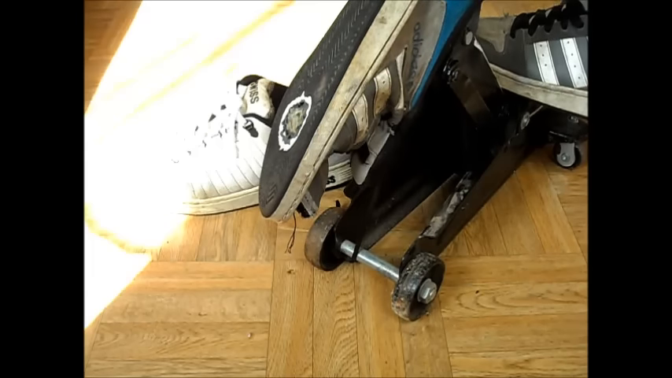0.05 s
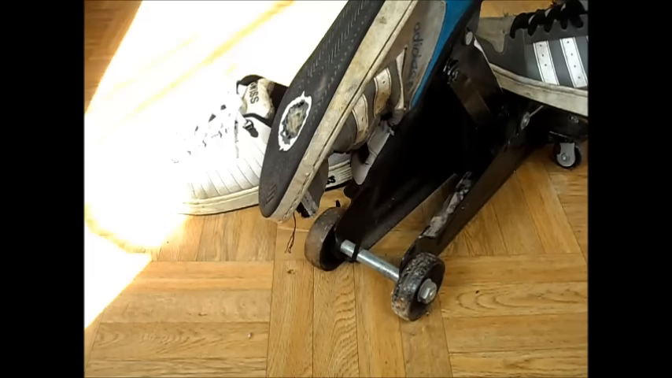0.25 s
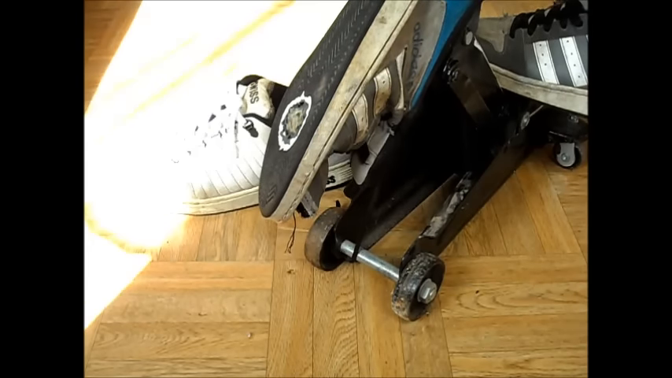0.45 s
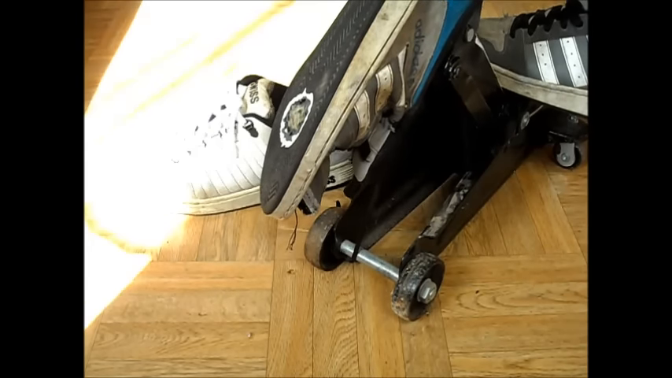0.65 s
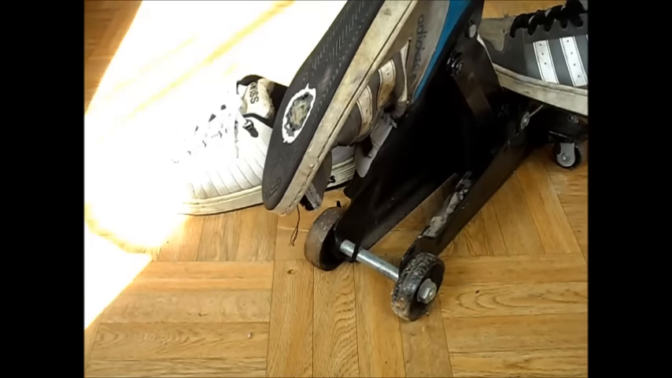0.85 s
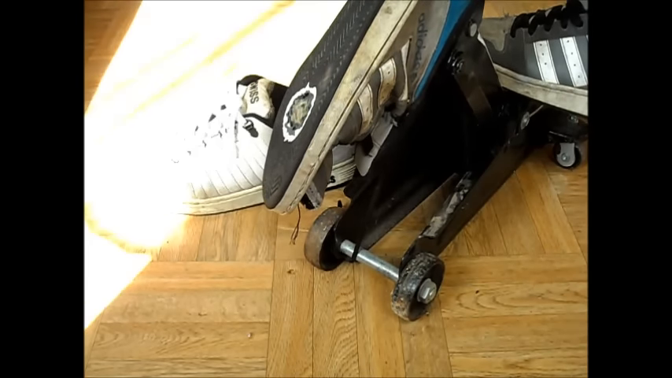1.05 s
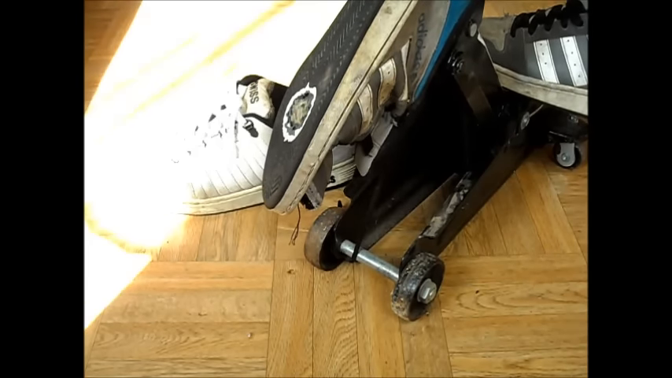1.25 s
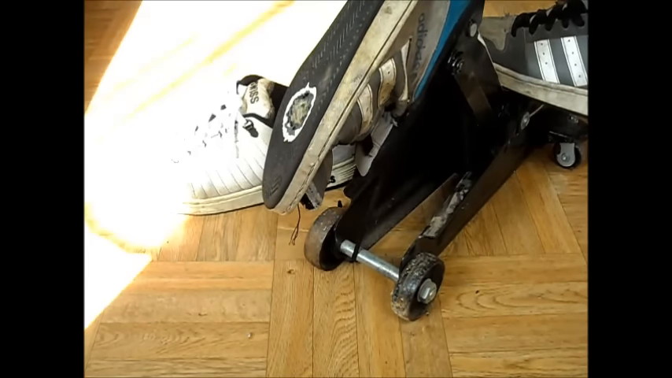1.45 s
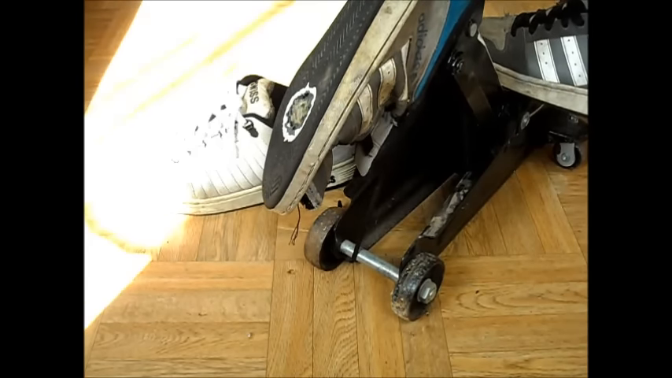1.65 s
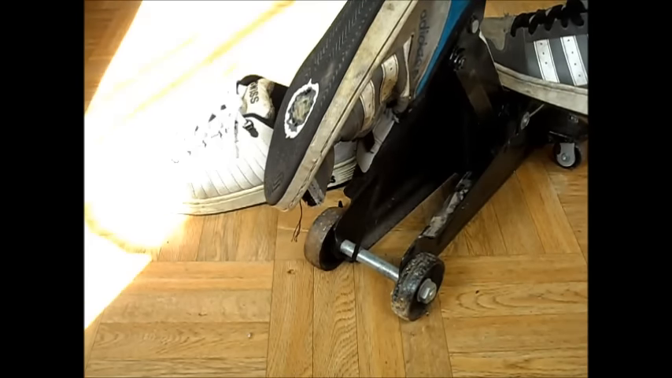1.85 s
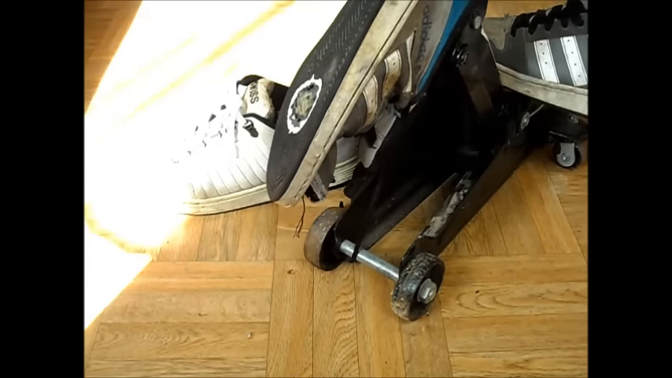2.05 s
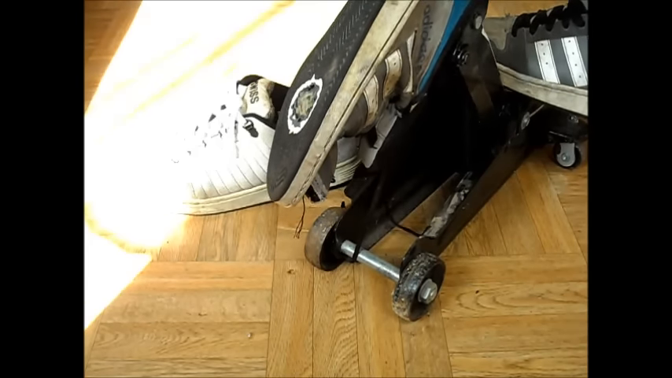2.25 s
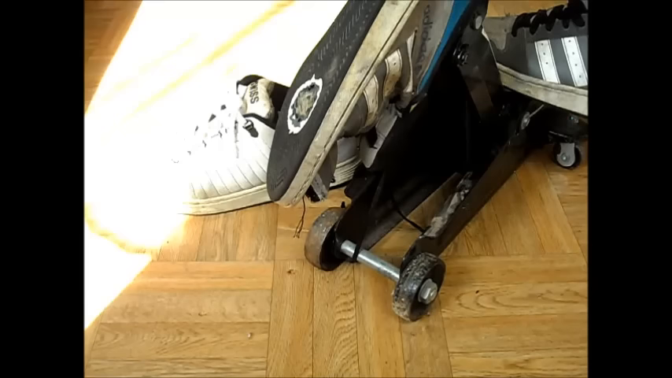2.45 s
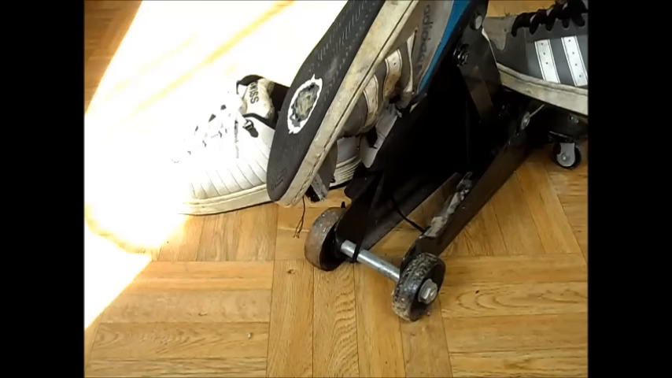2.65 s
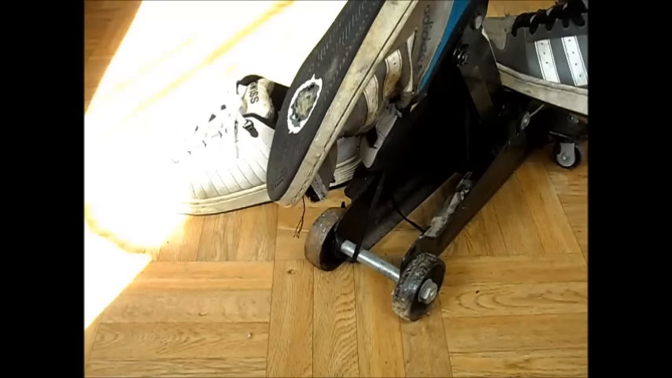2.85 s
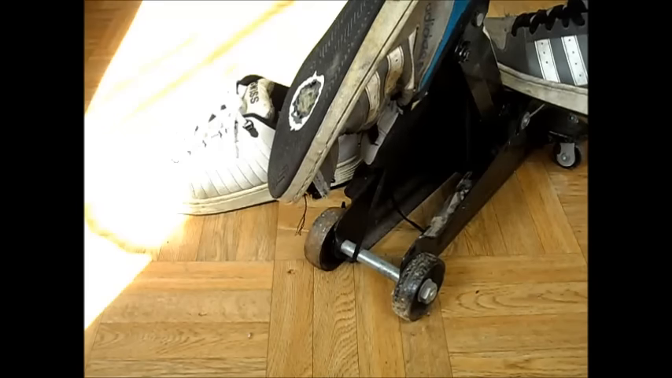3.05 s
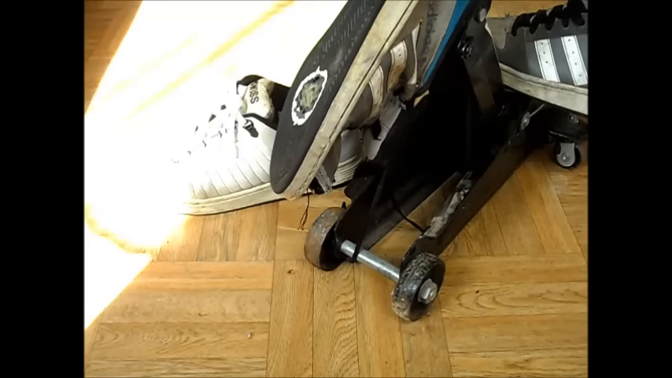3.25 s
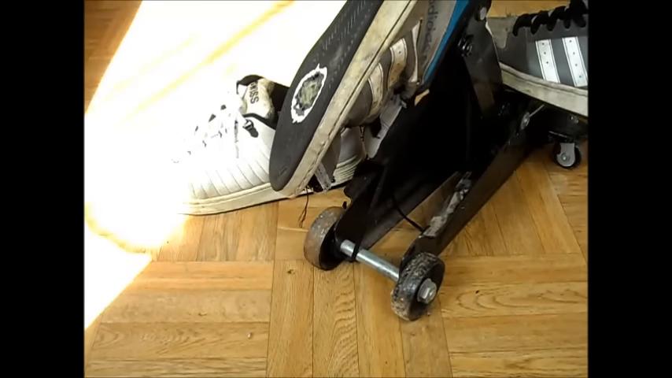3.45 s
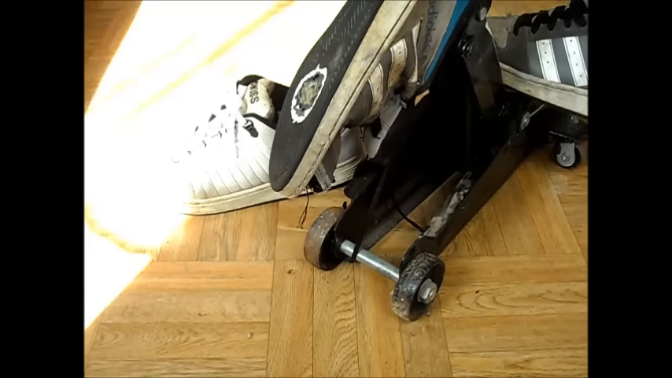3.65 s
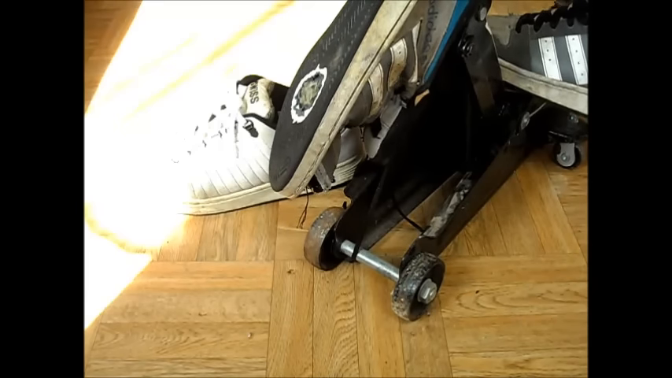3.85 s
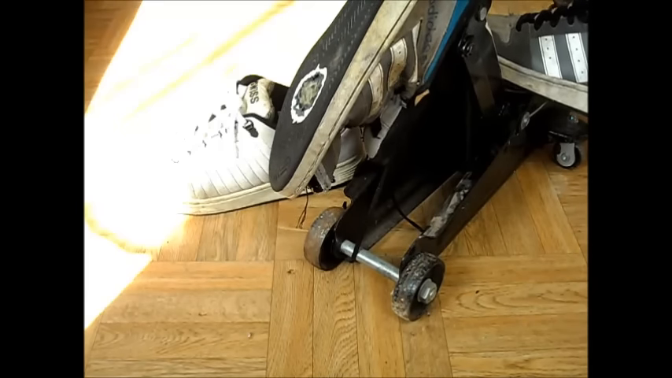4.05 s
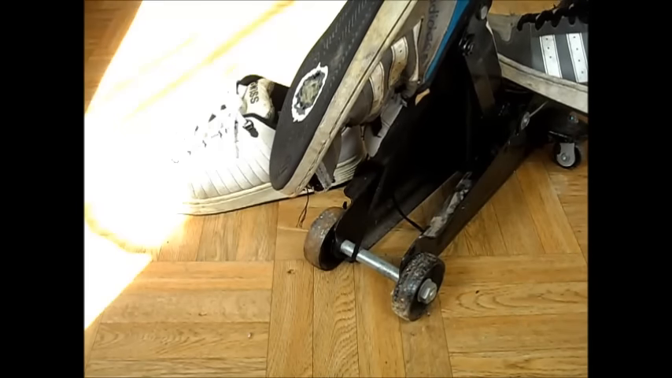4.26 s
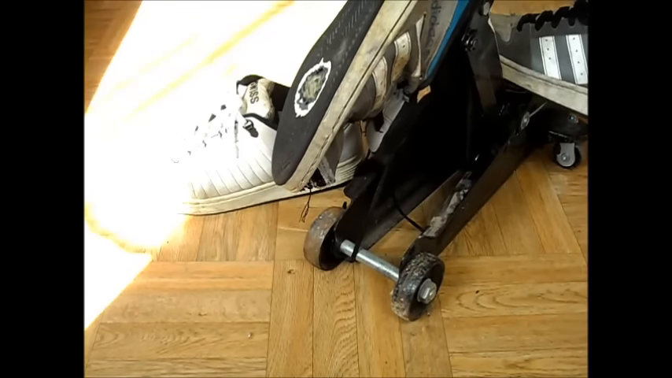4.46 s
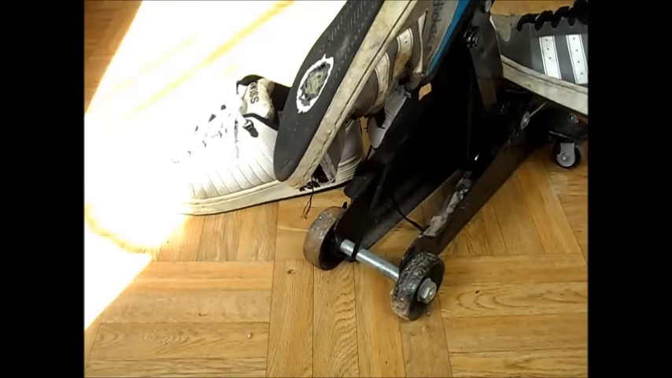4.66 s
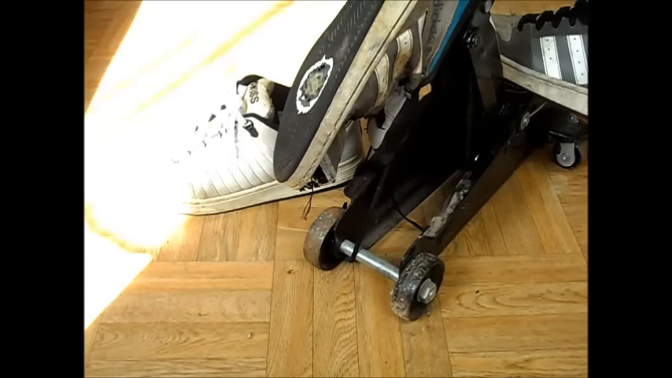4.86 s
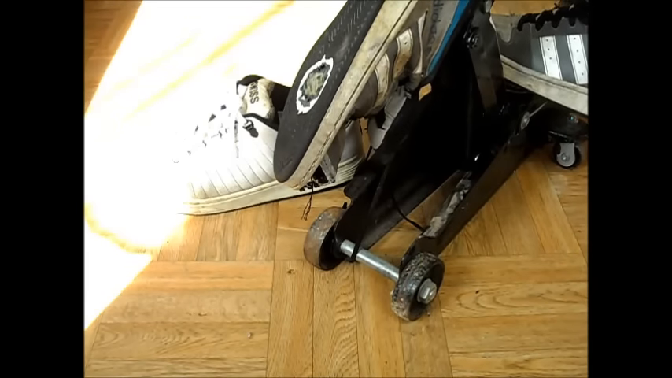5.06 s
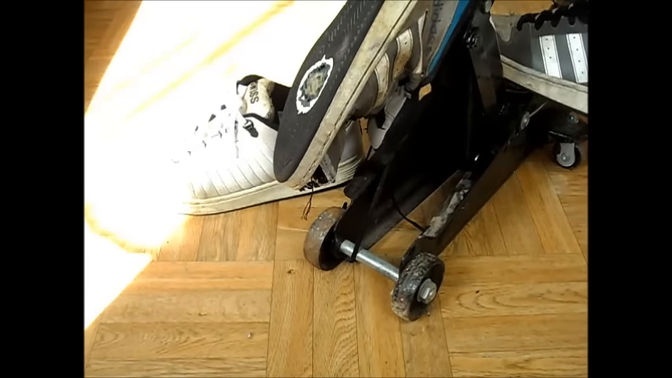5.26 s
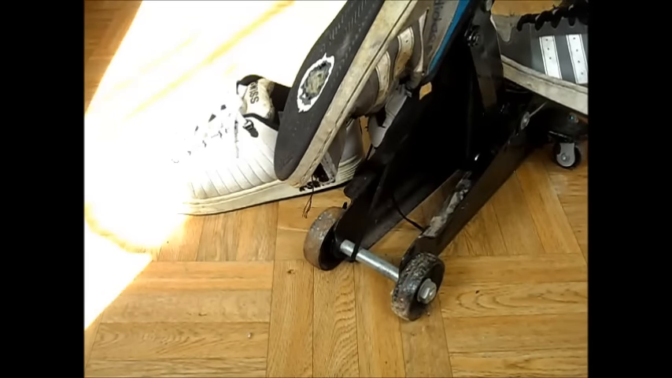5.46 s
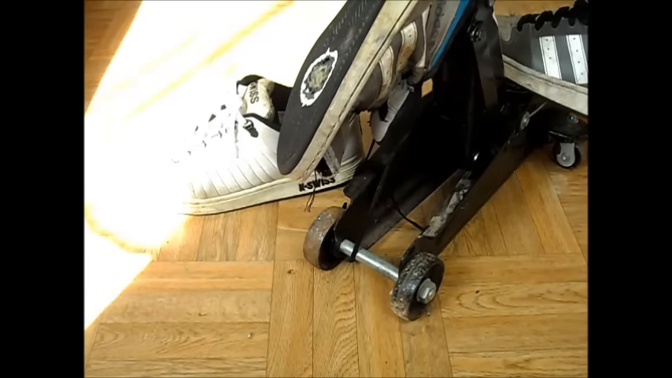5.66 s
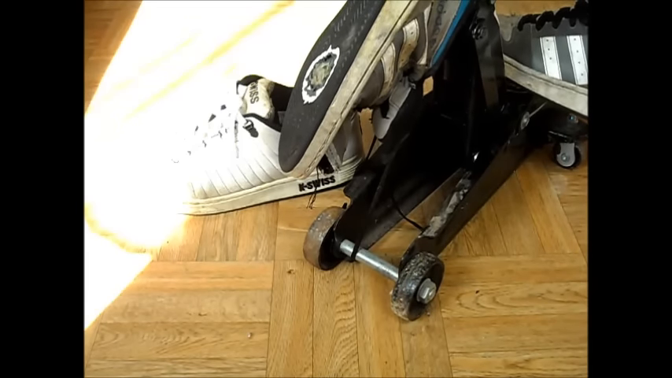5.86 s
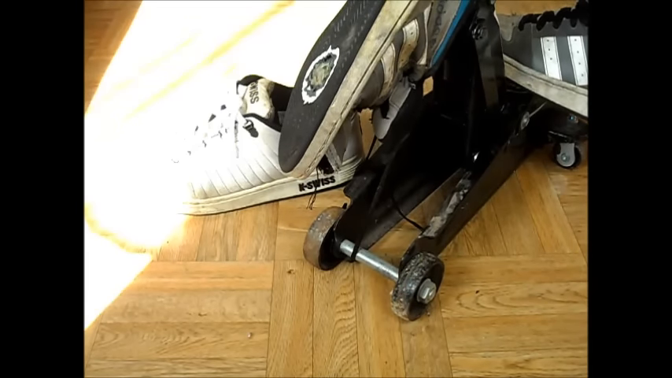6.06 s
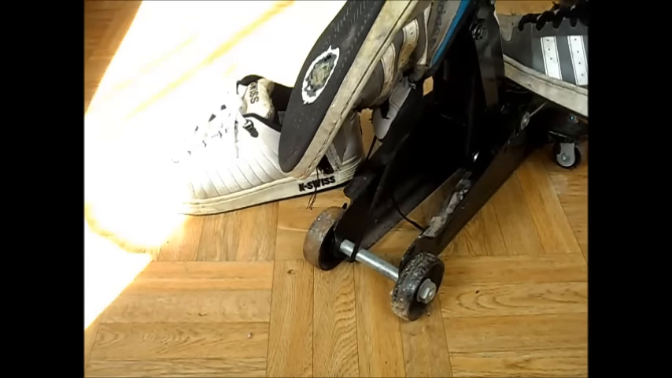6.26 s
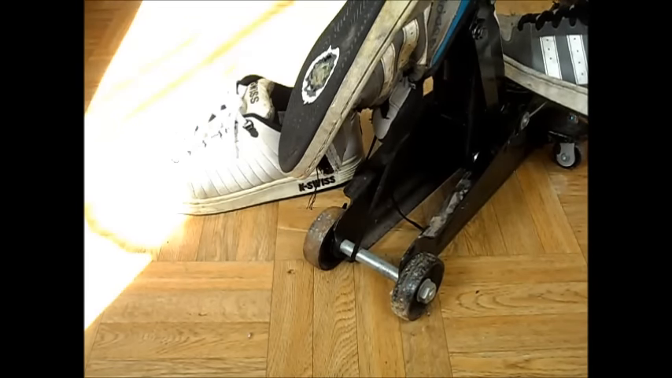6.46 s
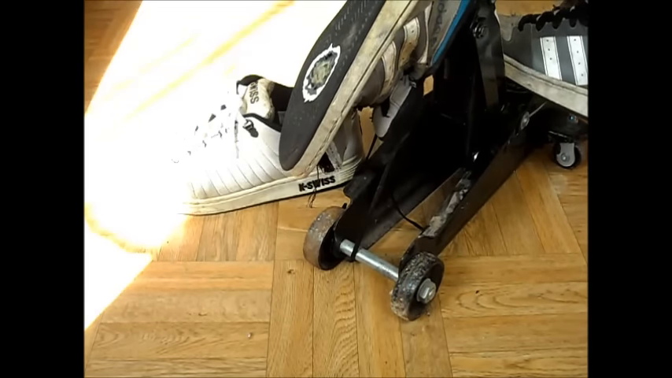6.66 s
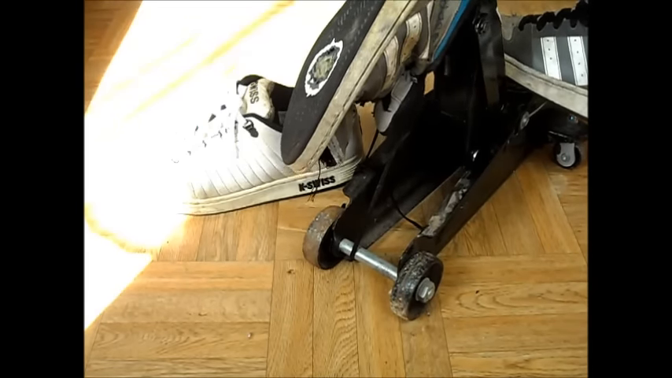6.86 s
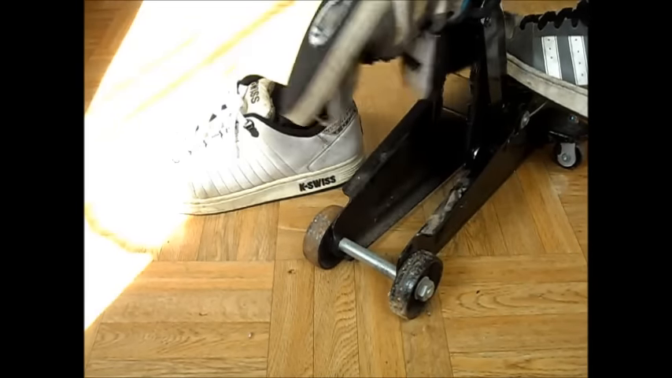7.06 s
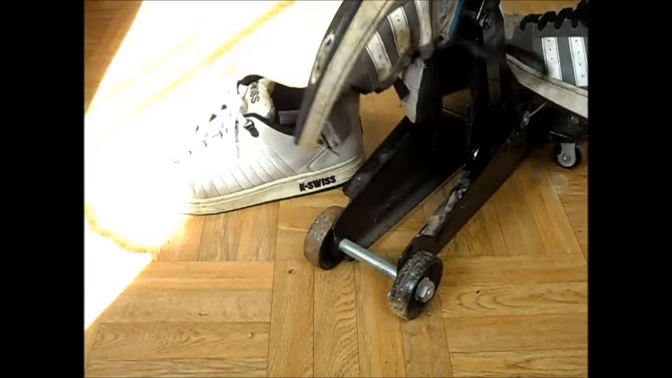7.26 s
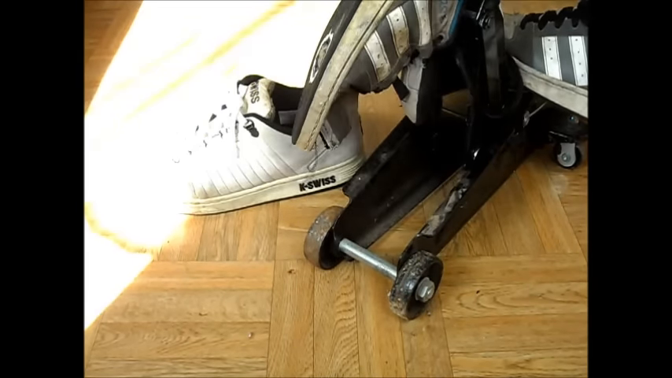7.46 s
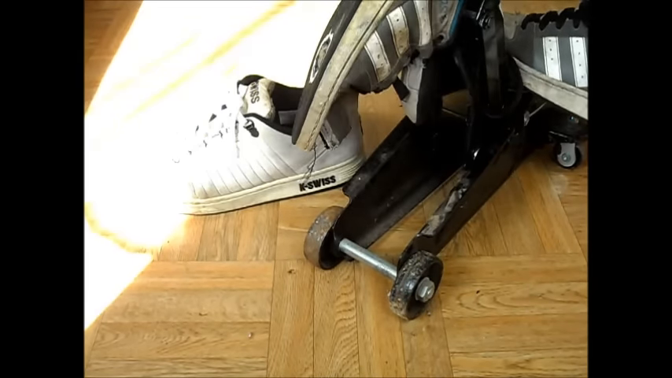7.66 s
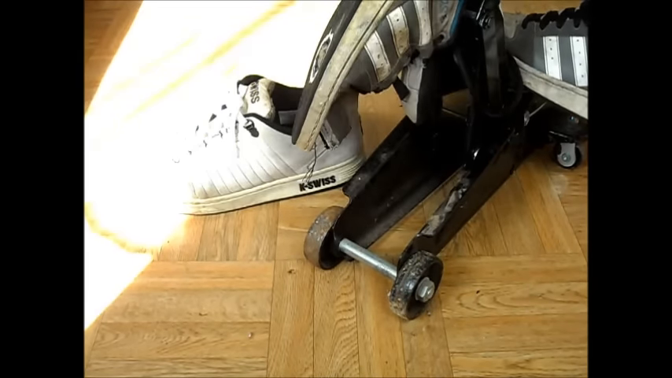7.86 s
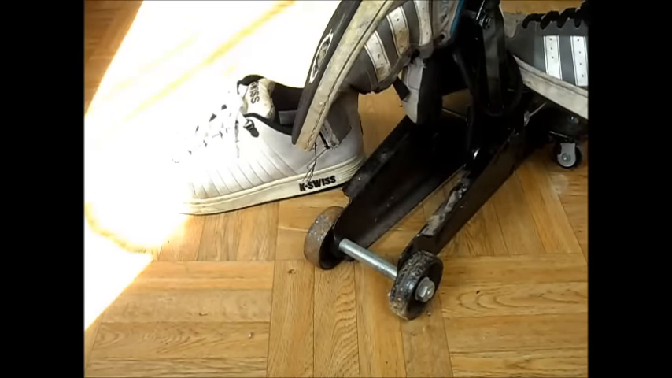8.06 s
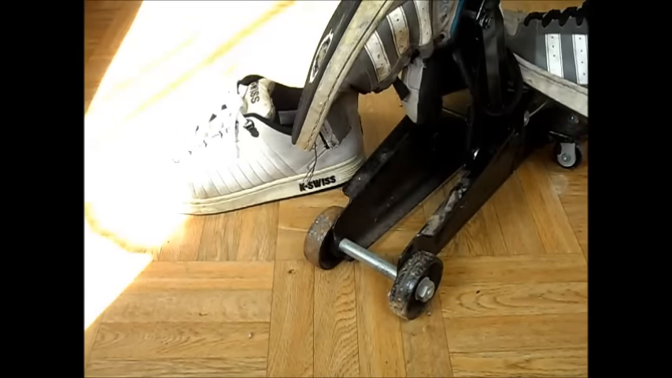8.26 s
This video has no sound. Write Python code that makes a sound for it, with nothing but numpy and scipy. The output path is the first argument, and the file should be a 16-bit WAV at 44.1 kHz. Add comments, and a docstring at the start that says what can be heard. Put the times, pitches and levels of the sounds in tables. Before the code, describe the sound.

Metallic clunks, rattles and low floor thumps repeat as a jack lifts against a shoe indoors, ending in one violent steel crack and quiet hiss.

```python
"""A soft rub of a shoe on a steel arm comes first, over faint hiss, then a trolley jack is pumped.
Place: parquet in a small room, heard by one microphone with the room's reflections strong around the steel.
Each stroke takes up slack, thumps the floor modes and clanks the linkage, made of swarms of tiny contacts
through coloured filters; pivots scrape, ping and squeak, and rubber and loaded steel rub and groan.
At last the shoe slips and the arm snaps free with a loud crack, which turns the recorder's gain down."""
import sys
import numpy as np
from scipy import signal
from scipy.io import wavfile
from scipy.ndimage import uniform_filter1d

SR = 44100
rng = np.random.default_rng(int(sys.argv[2]) if len(sys.argv) > 2 else 0)


def wav_out(sig):
    """Save sig, one row per channel (or a flat mono array), as 16-bit PCM at SR to the path in sys.argv[1]."""
    wavfile.write(sys.argv[1], SR, np.round(np.clip(np.atleast_2d(sig).T, -1, 1) * 32767).astype(np.int16))


N = 366010

# Levels of events are in dB before the trim of their layer; colours and modes are relative.
# t60_s is the time to die by 60 dB.

# air and microphone noise, colour: hz, level_db
HISS = [(20, -9.5), (90, 1), (170, -5.5), (270, -8), (500, -10), (1000, -13.5), (2000, -17), (4000, -20),
        (7000, -21), (10500, -25)]
# room decay: hz, t60_s
ROOM = [(100, 0.63), (300, 0.31), (700, 0.38), (2300, 0.47), (5500, 0.32), (10000, .28)]
# modes of the floor: pitch_hz, level_db, t60_s
FLOOR = [(56, -16.5, .25), (76.4, 8.5, .36), (102.4, 8, 0.37), (122, -12.5, .2), (142.4, -12, 0.96)]
# clusters of close modes in the steel arm: centre_hz, spread_hz (either side), level_db, t60_s
ARM = [(189.2, 13, -5.5, 0.53), (258, 44, 1, .42), (393, 53, -9, 0.58), (673, 45, -11.5, 0.72),
       (1078, 110, -1.5, 0.19), (2217, 250, -10, 0.21), (3310, 650, -15, 0.43), (5450, 340, -10, 0.38),
       (7970, 120, -20, .32)]
# colours of the heavy frame, the lever, the pivots, the rubbing and the snap: hz, level_db
FRAME = [(70, -29), (130, 2.5), (185, -2), (250, -4), (310, 4.5), (372, 2.5), (440, 0.5), (520, -9.5),
         (600, -9), (660, -5), (780, -22.5), (1200, -46.5)]
LEVER = [(500, -22), (800, -2), (1000, 0.5), (1150, 5), (1340, 3), (1630, -7.5), (2050, -0.5),
         (2600, -11.5), (3050, -14), (3700, -24.5), (5400, -32), (9000, -46.5)]
PIVOT = [(1200, -26), (2300, 7.5), (3300, -1.5), (3800, 2), (4250, -1), (4800, -4), (5450, 3), (6200, -3),
         (7100, -4.5), (7900, -7.5), (9000, -10), (10500, -26)]
RUB = [(100, -18), (180, 0.5), (370, 3.5), (520, -6.5), (900, -11.5), (1300, -16), (2200, -18),
       (3500, -23.5), (8000, -34)]
SNAP = [(40, -39), (150, -17.5), (350, -0.5), (720, 1.5), (1100, -2.5), (1700, -10.5), (2700, -10),
        (4200, -16), (5600, -15), (7000, -18.5), (10500, -30)]

# further slides of the shoe on the arm, one already under way as the sound begins and one as the shoe slips
# before the crack: start_s, length_s, rub_db, rumble_db, fade_db (over the length)
CREEPS = [(0.0, 0.348, -52, -48, -4), (6.89, 0.25, -58.5, -66, 4.5)]
# the loaded frame and the rubber sole groan: start_s, length_s, level_db, pitch_hz
GROANS = [(0.558, 0.046, -31, 379), (4.169, 0.13, -46, 369), (4.841, 0.051, -38.5, 378),
          (4.985, 0.078, -43.5, 209), (5.114, 0.16, -49, 378.3), (5.312, 0.15, -45.5, 367),
          (6.475, 0.067, -40, 385)]
# pivots squeak: start_s, length_s, level_db, pitch_hz, glide_hz_per_s
SQUEAKS = [(1.338, 0.025, -48, 1440, 1000), (1.368, 0.044, -53.5, 1596, -7000),
           (1.38, 0.052, -58.5, 1980, -6000), (6.227, 0.04, -58.5, 2026, -500),
           (6.312, 0.018, -59, 2000, -2000)]
# dry steel slips under the load: start_s, level_db
SLIPS = [(3.7199, -51), (5.296, -48.5), (6.8733, -57), (6.9037, -43.5), (6.986, -52.5)]
# small parts ping: start_s, level_db, pitch_hz, t60_s
PINGS = [(1.785, -47, 5430, 0.041), (3.544, -55.5, 4270, .04), (3.639, -49.5, 6130, 0.021),
         (4.867, -57, 5920, 0.025), (4.9323, -54, 6100, 0.011), (6.0192, -46.5, 6030, 0.013),
         (6.9063, -46, 6400, 0.012), (7.2978, -51.5, 5950, 0.0052)]
# low resonances that linger after the hardest blows: start_s, level_db, pitch_hz, t60_s
HUMS = [(1.792, -42.5, 141, 1.44), (7.051, -33, 49.4, 1.6)]
# the jack rocks on the floor, and the low modes swell a second time: start_s, level_db, drop_s (delay of the
# second swell)
THUMPS = [(1.061, -38.5, .041), (1.313, -44.5, .042), (2.209, -31, .035), (3.465, -32, .043),
          (3.674, -40, 0.043), (4.752, -40, .045)]
# the load shifts with a single knock: start_s, frame_db, lever_db and thud_db (both relative to the frame)
KNOCKS = [(0.134, -49, -14.5, -25), (1.239, -42.5, -4.5, -8), (1.629, -57.5, 0.5, 2), (1.717, -48.5, -2, 3),
          (3.718, -46, -2.5, -14), (4.828, -49, -7, -7), (5.18, -43.5, -11, -13), (6.308, -50.5, -8, 7),
          (7.751, -55.5, -4.5, 7)]
# handle down: the slack closes, the pivots bite in two catches, then the arm slides against the shoe:
# start_s, slack_db, bite_delay_s, frame_db, lever_db (relative), scrape_db, second_catch_db (relative),
# slide_length_s, rub_db, rumble_db, fade_db (over the slide)
PUSHES = [(1.033, -48.5, 0.11, -40, -7, -54.5, 2.5, 0.37, -47, -55, -9.5),
          (2.13, -43, 0.157, -44, -2.5, -46.5, 2.5, 0.4, -50.5, -49, -9),
          (3.379, -43.5, 0.17, -50.5, 4.5, -57, 1, 0.39, -48, -45.5, -3.5),
          (4.711, -45, 0.134, -46, -2.5, -52.5, 7.5, 0.54, -47, -47.5, -12.5),
          (5.969, -47, 0.024, -39.5, -2.5, -47.5, -0.5, 0.53, -43, -46, -23)]
# handle up: the slack closes, the linkage rattles, then grazes its stop, hits it and rebounds:
# start_s, slack_db, rattle_db, stop_delay_s, frame_db, lever_db (relative), thud_db (relative), scrape_db,
# graze_db (relative), rebound_db (each, relative to the one before)
LIFTS = [(0.436, -48.5, -51, 0.13, -34.5, -5.5, -6, -65, -12.5, -13.5),
         (1.68, -48.5, -46.5, 0.09, -32.5, -3, -2.5, -44.5, -17, -5),
         (2.827, -51, -53, 0.140, -34.5, -3, -5.5, -53, -9.5, -7),
         (4.163, -43.5, -51.5, 0.11, -35, -3, 6, -52, -16, -13),
         (5.297, -42, -49.5, 0.144, -37, -3, -10, -67, -8.5, -11.5),
         (6.493, -47.5, -49.5, 0.093, -34.5, -9.5, -6, -67, -5, -3.5)]
# the arm snaps free, followed by a few sharp echoes: start_s, strength_db
CRACK = [(7.0408, 4), (7.0505, -12.5), (7.0561, -12.5), (7.0625, -10.5), (7.0700, -17.5), (7.0845, -16)]
# the arm's weight lands on the floor: start_s, level_db
LANDING = [(7.043, -18.5), (7.083, -21.5), (7.109, -33)]

# time from one contact to the next as steel bounces
BOUNCE_S = 0.019
# time scales of the clatter, before the frame and the lever stretch them
SLACK_CLATTER_S, SLACK_SNAP_CLATTER_S, BITE_CLATTER_S = 0.0048, 0.0025, 0.0041
STOP_CLATTER_S, KNOCK_CLATTER_S = 0.0044, 0.0051
SCRAPE_CLATTER_S = 0.0038  # used as it is
# a slack knock and a bite, relative to the frame
SLACK_LEVER_DB, SLACK_THUD_DB, BITE_THUD_DB = -10, 0, -3
# the loose lever snaps home just after each slack knock: delay, frame relative to that knock, lever to the frame
SLACK_SNAP_S, SLACK_SNAP_DB, SLACK_SNAP_LEVER_DB = 0.009, -5.5, 0
# the rattle of a lift grows towards the stop and shakes the floor a little
RATTLE_SWELL_DB, RATTLE_RUMBLE_DB = 1.5, -4
# after the stop the jack settles: levels relative to the blow
SETTLE_S, SETTLE_DB, SETTLE_RUMBLE_DB, SETTLE_FADE_DB = 0.2, -16, -5.5, -17.5
# every rub starts and stops softly
RUB_ATTACK_S, RUB_RELEASE_S = 0.027, 0.044
# relative to the thump: the second swell and the jolt of the frame; then the lever relative to that jolt
SECOND_SWELL_DB, JOLT_DB, JOLT_LEVER_DB = 0, -8, -16.5
# upper band limit of the recorder
EDGE_HZ = 10650


def amp(db):
    """Turns decibels into an amplitude factor."""
    return 10 ** (np.asarray(db) / 20)


def evened(x):
    """Scales a steady sound to rms 1."""
    return x / np.sqrt(np.mean(x ** 2) + 1e-20)


def topped(x):
    """Scales a blow so that its loudest 10 ms have rms 1."""
    return x / np.sqrt(uniform_filter1d(x ** 2, size=441, mode="constant").max() + 1e-20)


def read(points, hz):
    """Reads a curve between its points, on a logarithmic frequency scale."""
    f, value = np.transpose(points)
    return np.interp(np.log(hz + 1), np.log(f + 1), value)


def add(mix, s, sound):
    """Lays a sound into the mix at s seconds, cut at the end."""
    part = mix[round(s * SR):][:len(sound)]
    part += sound[:len(part)]


def through(x, response):
    """Convolves with an impulse response, keeping the length."""
    return signal.fftconvolve(x, response)[:len(x)]


def colour(points):
    """Causal (minimum-phase) impulse response with the given spectrum and energy 1."""
    hz = abs(np.fft.fftfreq(4096, 1 / SR))
    log_gain = np.log(amp(read(points, hz)))
    spectrum = np.exp(np.conj(signal.hilbert(log_gain)))
    response = np.fft.ifft(spectrum).real[:2048]
    return response / np.linalg.norm(response)


def varied(points, spread_db):
    """The same part struck at another spot: its resonances shift in strength."""
    hz, db = np.transpose(points)
    return np.transpose([hz, db + spread_db * rng.standard_normal(len(hz))])


def ring(modes):
    """Sum of dying sines."""
    t = np.arange(2 * SR) / SR
    return sum(amp(db - 60 * t / t60) * np.sin(2 * np.pi * hz * t) for hz, db, t60 in modes)


def clatter(length_s, per_s=2200):
    """Loose steel meets in a quick swarm of small contacts that swells and dies."""
    u = np.arange(SR) / SR / length_s
    contacts = rng.standard_normal(SR) * (rng.random(SR) < per_s / SR)
    return contacts * u * np.exp(-u)


def room_tail(build_s=0.0045):
    """Dense reflections of energy 1, building up softly, each band dying at its own speed."""
    hz, t, bands = signal.stft(rng.standard_normal(SR), SR, nperseg=256)
    decay = amp(-60 * t / read(ROOM, hz)[:, None])
    tail = signal.istft(bands * decay, SR, nperseg=256)[1][:SR]
    tail *= 1 - np.exp(-(np.arange(SR) / SR / build_s) ** 2)
    return tail / np.linalg.norm(tail)


def in_room(x, tail, wet_db):
    """Adds the room's reflections to the direct sound."""
    return x + amp(wet_db) * through(x, tail)


def hiss(hiss_db=-61):
    """Steady air and microphone noise."""
    return amp(hiss_db) * evened(through(rng.standard_normal(N), colour(HISS)))


def boom(rise_s=0.0072, low_hz=52):
    """The floor answers a push with a soft start and its beating low modes."""
    modes = ring(FLOOR)
    modes = modes * (1 - np.exp(-np.arange(len(modes)) / SR / rise_s))
    return signal.sosfilt(signal.butter(2, low_hz, "highpass", fs=SR, output="sos"), modes)


def rubs():
    """Slides after bites, rattles before stops, settling, creeps: start_s, length_s, rub_db, rumble_db, fade_db."""
    rows = [(s + delay_s, *slide) for s, _, delay_s, _, _, _, _, *slide in PUSHES]
    for s, _, rattle_db, delay_s, db, *_ in LIFTS:
        rattle_s = delay_s + RUB_RELEASE_S
        rows.append((s, rattle_s, rattle_db, rattle_db + RATTLE_RUMBLE_DB, RATTLE_SWELL_DB))
        rows.append((s + delay_s, SETTLE_S, db + SETTLE_DB, db + SETTLE_RUMBLE_DB, SETTLE_FADE_DB))
    return rows + CREEPS


def rubbing(tail, per_s=500, rub_db=-7.5, rumble_db=-3):
    """Tiny slips of rubber and steel keep the frame and the floor stirring."""
    on_frame, on_floor = np.zeros((2, N))
    for s, length_s, db, low_db, fade_db in rubs():
        t = np.arange(0, length_s, 1 / SR)
        attack = np.minimum(t / RUB_ATTACK_S, 1)
        release = np.minimum((length_s - t) / RUB_RELEASE_S, 1)
        shape = attack * release * amp(fade_db * t / length_s)
        add(on_frame, s, amp(db) * shape)
        add(on_floor, s, amp(low_db) * shape)
    slips = evened(rng.standard_normal(N) * (rng.random(N) < per_s / SR))
    rub = in_room(through(slips * on_frame, colour(RUB)), tail, wet_db=-2)
    rumble = evened(through(slips, boom())) * on_floor
    return amp(rub_db) * rub + amp(rumble_db) * rumble


def groans(tail, jitter=0.1, groan_db=-3):
    """Slow stick-slip under load keeps one low resonance going, unevenly."""
    out = np.zeros(N)
    for s, length_s, db, hz in GROANS:
        swell = signal.windows.hann(round(length_s * SR))
        noises = rng.standard_normal((2, SR))
        waver, grip = (evened(uniform_filter1d(z, size=220))[:len(swell)] for z in noises)
        phase = 2 * np.pi * np.cumsum(hz * (1 + jitter * waver)) / SR
        groan = swell * amp(2 * grip) * np.sin(phase)
        add(out, s, amp(db + groan_db) * topped(groan))
    return in_room(out, tail, wet_db=-4.5)


def squeaks(tail, jitter=0.063, octave_db=-6, squeak_db=-2):
    """Unsteady stick-slip: wavering, gliding tones and their octaves."""
    out = np.zeros(N)
    for s, length_s, db, hz, glide in SQUEAKS:
        t = np.arange(0, length_s, 1 / SR)
        waver = evened(uniform_filter1d(rng.standard_normal(SR), size=50))[:len(t)]
        phase = 2 * np.pi * np.cumsum((hz + glide * t) * (1 + jitter * waver)) / SR
        tone = np.sin(phase) + amp(octave_db) * np.sin(2 * phase)
        add(out, s, amp(db + squeak_db) * signal.windows.hann(len(t)) * tone)
    return in_room(out, tail, wet_db=-3)


def scrapes():
    """The pivots slip twice at each bite and each stop, and now and then by themselves: start_s, level_db."""
    bites = [(s + delay_s, db, second_db) for s, _, delay_s, _, _, db, second_db, *_ in PUSHES]
    stops = [(s + delay_s, db, rebound_db) for s, _, _, delay_s, _, _, _, db, _, rebound_db in LIFTS]
    pairs = [(s + k * BOUNCE_S, db + k * step_db) for s, db, step_db in bites + stops for k in range(2)]
    return pairs + SLIPS


def pivots(tail, scrape_db=-4, ping_db=-6, ping_s=0.0011):
    """Bright slips of dry steel, and the short ring of pins and washers."""
    out, steel = np.zeros(N), colour(PIVOT)
    for s, db in scrapes():
        slip = in_room(through(clatter(SCRAPE_CLATTER_S), steel), tail, wet_db=-1.0)
        add(out, s, amp(db + scrape_db) * topped(slip))
    for s, db, hz, t60 in PINGS:
        ping = in_room(through(clatter(ping_s), ring([(hz, 0, t60)])), tail, wet_db=-7)
        add(out, s, amp(db + ping_db) * topped(ping))
    return out


def clanks():
    """Every blow: start_s, frame_db, lever_db and thud_db (both relative to the frame), clatter_s."""
    rows = []
    for s, db, *_ in PUSHES + LIFTS:
        snap_s, snap_db = s + SLACK_SNAP_S, db + SLACK_SNAP_DB
        rows.append((s, db, SLACK_LEVER_DB, SLACK_THUD_DB, SLACK_CLATTER_S))
        rows.append((snap_s, snap_db, SLACK_SNAP_LEVER_DB, SLACK_THUD_DB, SLACK_SNAP_CLATTER_S))
    for s, _, delay_s, db, lever_db, _, second_db, *_ in PUSHES:
        for k in range(2):
            bite_s = s + delay_s + k * BOUNCE_S
            rows.append((bite_s, db + k * second_db, lever_db, BITE_THUD_DB, BITE_CLATTER_S))
    for s, _, _, delay_s, db, lever_db, thud_db, _, graze_db, rebound_db in LIFTS:
        stop_s = s + delay_s
        rows.append((stop_s - BOUNCE_S, db + graze_db, lever_db, thud_db, STOP_CLATTER_S))
        for k in range(3):  # the hit and two rebounds
            rows.append((stop_s + k * BOUNCE_S, db + k * rebound_db, lever_db, thud_db, STOP_CLATTER_S))
    # a jolt adds no thud: the thump already shakes the floor
    rows += [(s, db + JOLT_DB, JOLT_LEVER_DB, -np.inf, KNOCK_CLATTER_S) for s, db, _ in THUMPS]
    return rows + [(*knock, KNOCK_CLATTER_S) for knock in KNOCKS]


def floor(thump_db=-3, thud_db=-6, landing_db=-0.5):
    """Rocking, blows and the final landing all shake the same floor modes; a few low hums linger."""
    out, thud = np.zeros(N), topped(boom())
    for s, db, drop_s in THUMPS:
        add(out, s, amp(db + thump_db) * thud)
        add(out, s + drop_s, amp(db + thump_db + SECOND_SWELL_DB) * thud)
    for s, db, _, share_db, _ in clanks():
        add(out, s, amp(db + share_db + thud_db) * thud)
    for s, db in LANDING:
        add(out, s, amp(db + landing_db) * thud)
    for s, db, hz, t60 in HUMS:
        add(out, s, ring([(hz, db, t60)]))
    return out


def linkage(frame_db=-3, lever_db=-3.5, frame_slowness=1.23, lever_slowness=0.94, spread_db=1.5):
    """Each blow sounds the heavy, slow frame and the lighter lever, each time at another spot."""
    out = np.zeros(N)
    tails = [room_tail() for _ in range(6)]  # blows take turns with six patterns of reflections
    for k, (s, db, clank_db, _, length_s) in enumerate(clanks()):
        tail = tails[k % len(tails)]
        frame, lever = colour(varied(FRAME, spread_db)), colour(varied(LEVER, spread_db))
        low = in_room(through(clatter(length_s * frame_slowness), frame), tail, wet_db=-1.5)
        high = in_room(through(clatter(length_s * lever_slowness), lever), tail, wet_db=-1.0)
        blow = amp(frame_db) * topped(low) + amp(lever_db + clank_db) * topped(high)
        add(out, s, amp(db) * blow)
    return out


def arm_ring(count=48):
    """Many close modes beat against each other in each cluster of the steel arm."""
    t, out = np.arange(SR) / SR, np.zeros(SR)
    for hz, spread_hz, db, t60 in ARM:
        offset, phase = rng.uniform(-1, 1, (2, count, 1))
        cluster = np.sin(2 * np.pi * ((hz + spread_hz * offset) * t + phase)).sum(0)
        out += amp(db) * topped(cluster * amp(-60 * t / t60))
    return out


def crack(snap_db=8.0, arm_db=-22, frame_db=-20.0, shake_s=0.0091, rebound_db=-1.5):
    """One hard steel blow and a few sharp echoes ring the arm, shake the frame and fill the room."""
    blows, body, tail = np.zeros(N), np.zeros(N), room_tail()
    for k, (s, db) in enumerate(CRACK):
        side = (-1) ** k  # the pulses alternate in sign
        add(blows, s, side * amp([db + rebound_db * (k > 0)]))
    snap = amp(snap_db) * through(blows, colour(SNAP))
    shake = in_room(through(clatter(shake_s), colour(FRAME)), tail, wet_db=0.0)
    add(body, CRACK[0][0], amp(arm_db) * arm_ring() + amp(frame_db) * topped(shake))
    return in_room(snap, tail, wet_db=0.16) + body


def scene():
    """Sums the jack, shoe, floor and hiss into one channel."""
    tail = room_tail()
    steel = linkage() + floor() + pivots(tail)
    friction = squeaks(tail) + groans(tail) + rubbing(tail)
    return (steel + friction + crack() + hiss())[None]


def record(dry, threshold_db=-16, range_db=10.0, recover_db_per_s=0.63, attack_s=0.0082):
    """Gain drops quickly on a loud peak and creeps back; overload rounds the peak; then the band limit."""
    over_db = np.clip(20 * np.log10(abs(dry[0]) + 1e-9) - threshold_db, 0, range_db)
    creep = recover_db_per_s * np.arange(N) / SR
    held_db = np.maximum.accumulate(over_db + creep) - creep
    keep = np.exp(-1 / (attack_s * SR))
    reduction_db = signal.lfilter([1 - keep], [1, -keep], held_db)
    ducked = dry * amp(-reduction_db)
    rounded = ducked / (1 + (ducked / 0.76) ** 4) ** 0.25  # levels off towards 0.76
    band_limit = signal.firwin(255, EDGE_HZ, window=("kaiser", 8), fs=SR)
    return signal.oaconvolve(rounded, band_limit[None], "same")


dry = scene()
out = record(dry)
wav_out(out)
```